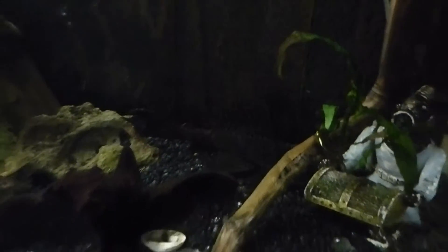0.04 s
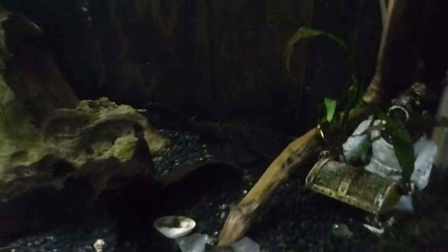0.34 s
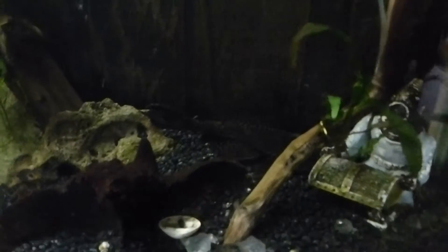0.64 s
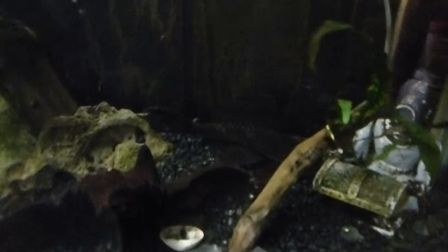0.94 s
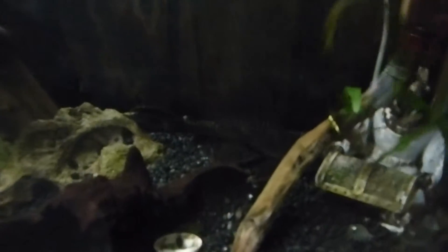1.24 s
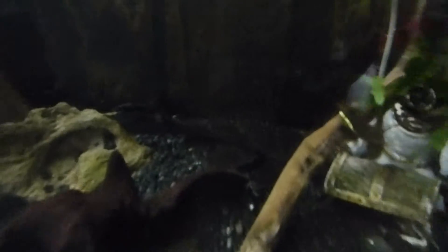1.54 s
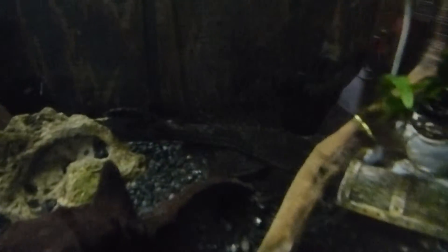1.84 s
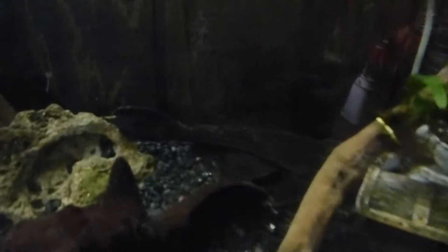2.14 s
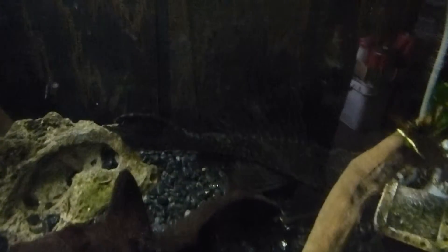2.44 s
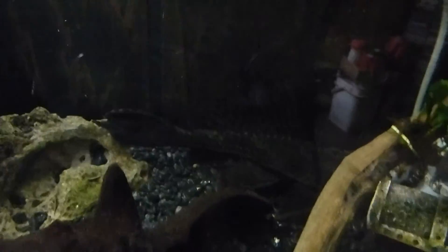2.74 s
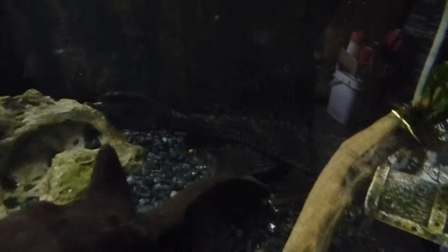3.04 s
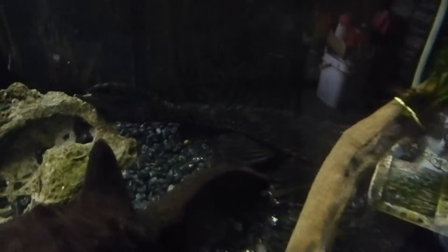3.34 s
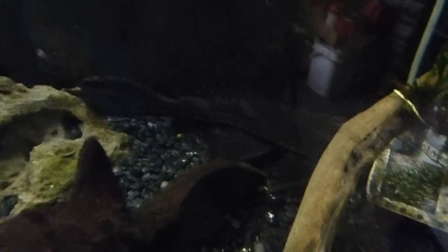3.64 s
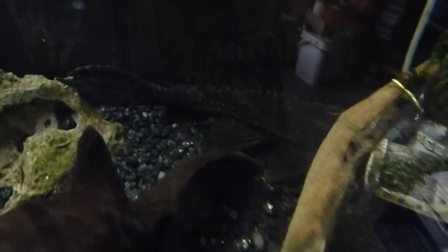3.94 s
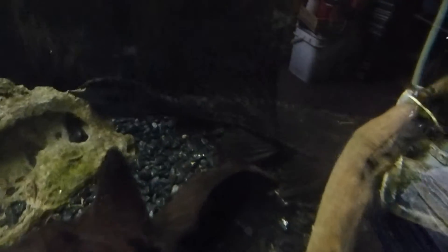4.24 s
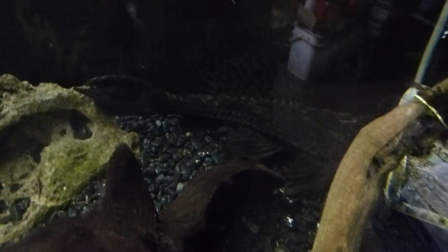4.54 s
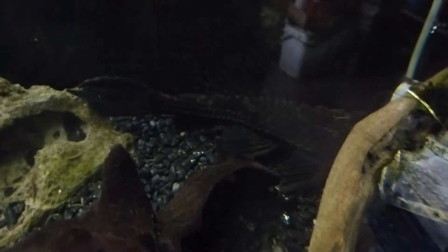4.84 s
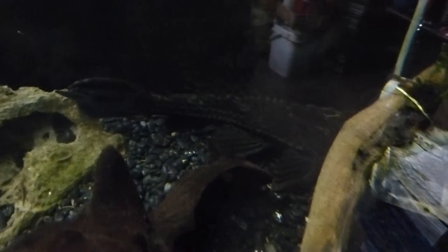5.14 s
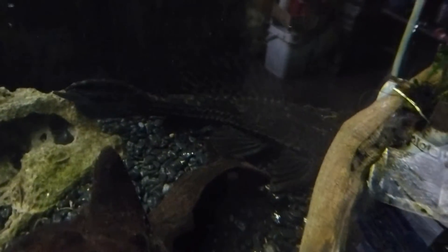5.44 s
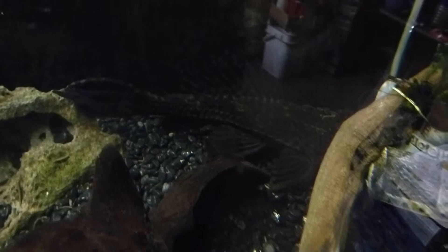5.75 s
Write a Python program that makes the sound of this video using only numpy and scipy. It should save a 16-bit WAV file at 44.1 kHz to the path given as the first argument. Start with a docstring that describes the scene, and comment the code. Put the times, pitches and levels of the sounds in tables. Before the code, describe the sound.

A filter outflow trickles softly into a large fish tank in a quiet room. Irregular drops plink and ping with a slight echo over a fine fizz of tiny bubbles, while a pump hums steadily underneath. The hum grows a little fuller as the microphone moves closer, just outside the glass. About four seconds in, something clicks sharply against the glass, and the dripping carries on.

```python
"""Fish tank in a quiet room

A filter outflow trickles into a large tank, heard from just outside the glass. Drops trap air bubbles
that ping and echo between water and lid, over a fine fizz of tiny ones. A mains pump hums, a little
fuller as the microphone moves in, and once something clicks sharply against the glass."""
import sys
import numpy as np
from scipy import signal
from scipy.fft import rfft, irfft, next_fast_len
from scipy.io import wavfile
from scipy.ndimage import uniform_filter1d

SR = 44100
rng = np.random.default_rng(int(sys.argv[2]) if len(sys.argv) > 2 else 0)


def to_wav(s):
    """Save 16-bit WAV."""
    ch = np.atleast_2d(s).T  # columns
    pcm = np.round(np.clip(ch, -1, 1) * 32767)  # PCM
    wavfile.write(sys.argv[1], SR, pcm.astype(np.int16))


N = 264717
T = np.arange(N) / SR


def from_db(db):
    return 10 ** (np.asarray(db) / 20)


def rms_one(x):
    return x / np.sqrt(np.mean(x ** 2) + 1e-20)


def gain_at_mic(near, far_db, near_db):
    """Gain between the microphone's far spot (near = 0) and its close one (near = 1)."""
    return from_db(far_db + (near_db - far_db) * near)


def spectrum_gain(spectrum, hz):
    """Gain read from rows of Hz and dB on a log-frequency axis."""
    row_hz, row_db = np.transpose(spectrum)
    return from_db(np.interp(np.log(np.maximum(hz, 1)), np.log(row_hz), row_db))


def fade(t, t60):
    """Falls by 60 dB in t60 seconds."""
    return np.exp(-np.log(1000) * t / t60)


def add(out, start_s, sound):
    """Mixes a sound in at its start time."""
    i = int(np.clip(round(start_s * SR), 0, N - 1))
    out[i:i + len(sound)] += sound[:N - i]


def lowpass(x, hz):
    return signal.lfilter(*signal.butter(2, hz, fs=SR), x)


def noise(gain_at):
    """Steady noise with a given gain over frequency; rms 1."""
    size = next_fast_len(N)
    spectrum = rfft(rng.standard_normal(size)) * gain_at(np.fft.rfftfreq(size, 1 / SR))
    return rms_one(irfft(spectrum, size)[:N])


def drift(rate_hz):
    """A slow random wander; rms 1."""
    return noise(lambda hz: 1 / (1 + (hz / rate_hz) ** 2))


def tank_echoes(t60, direct=0.27, room_db=-13, room_t60=0.7, build_s=0.0087):
    """Direct sound, reflections building up between water, glass and lid, then the room; energy 1."""
    t = T[:SR // 3]
    reflections = rng.standard_normal(len(t)) * (rng.random(len(t)) < 4000 / SR)
    early = reflections * fade(t, t60) * (1 - fade(t, build_s))
    late = rng.standard_normal(len(t)) * fade(t, room_t60)
    path = early / np.linalg.norm(early) + from_db(room_db) * late / np.linalg.norm(late)
    path[0] += direct
    return path / np.linalg.norm(path)


def lamp():
    """The tank lamp's electronics give a very faint, high whine."""
    # Each row: pitch in Hz, rms level in dB.
    whine = [(13383, -80), (13625, -81), (13684, -81), (13803, -78), (14282, -84), (14583, -83),
             (14643, -83), (14766, -83)]
    return sum(np.sqrt(2) * from_db(db) * np.sin(2 * np.pi * (hz * T + rng.random()) + drift(2))
               for hz, db in whine)


def rumble(near):
    """Water rushing through the filter, and the room's own low noise."""
    # Each row: frequency in Hz, relative spectral density in dB.
    rush_spectrum = [(25, -42), (42, -23), (70, -18.5), (100, -3.5), (140, -5), (220, -1.5), (310, -4.5),
                     (390, -6.5), (520, -7), (700, -8), (800, -7.5), (1100, -11), (1600, -18),
                     (3000, -21.5), (16000, -44.5)]
    return gain_at_mic(near, far_db=-52.5, near_db=-50) * noise(lambda hz: spectrum_gain(rush_spectrum, hz))


def pump(near, mains_hz=60.02, level_waver=0.062, phase_waver_rad=0.16):
    """Mains hum whose balance shifts with the microphone's place; churning water rings the housing."""
    # The hum's partials. Each row: multiple of the mains, rms level in dB from afar, the same close up.
    hum = [(.5, -75, -78), (1, -62, -62.5), (2, -71, -65.5), (2.5, -63, -62.5), (3, -52.5, -51),
           (4, -58.5, -57.5), (5, -59.5, -49), (6, -62, -62.5), (7, -63.5, -60), (8, -61.5, -59.5),
           (9, -73, -67)]
    # The housing's resonances. Each row: centre in Hz, half-width in Hz, rms level close up in dB.
    housing = [(633, 14.5, -58.5), (689, 13.6, -59.5)]
    out = np.zeros(N)
    for multiple, far_db, near_db in hum:
        phase = 2 * np.pi * (multiple * mains_hz * T + rng.random()) + phase_waver_rad * drift(6.1)
        level = gain_at_mic(near, far_db, near_db) * (1 + level_waver * drift(3.1))
        out += np.sqrt(2) * level * np.sin(phase)
    distance_loss_db = 11.7 * (1 - near) ** 2
    for centre, width, db in housing:
        out += from_db(db - distance_loss_db) * noise(lambda hz: 1 / (1 + ((hz - centre) / width) ** 2))
    return out


def glass_click(start_s=4.2446, snap_hz=1400):
    """One hard contact: a snap and a bright crack, two dull near echoes, and briefly ringing glass."""
    # The pane's modes. Each row: pitch in Hz, relative level in dB, seconds to fall 60 dB.
    glass_modes = [(97.5, -23, .055), (266, -28, 0.049), (320, -20, 0.038), (635, -32, 0.011),
                   (1005, -14.5, 0.054), (1098, -8, 0.023), (1483, -20, 0.05), (1990, -24, 0.036),
                   (2690, -24, 0.015), (4040, -29, 0.013)]
    # Echoes off nearby surfaces. Each row: delay in seconds, signed gain.
    near_echoes = [(.0022, -0.85), (.004, 0.17)]
    t, out = T[:SR // 4], np.zeros(N)
    snap = from_db(-6) * np.cos(2 * np.pi * snap_hz * t) * fade(t, 0.0028)
    crack = from_db(-23) * rng.standard_normal(len(t)) * fade(t, 0.016)
    contact = lowpass(snap, 4500) + lowpass(crack, 11000)
    ring = sum(from_db(db - 4) * np.sin(2 * np.pi * hz * t) * fade(t, t60) for hz, db, t60 in glass_modes)
    ring *= 1 - fade(t, 0.0072)   # the pane takes a moment to get going
    add(out, start_s, contact + ring)
    for delay_s, gain in near_echoes:
        add(out, start_s + delay_s, gain * lowpass(contact, 2200))
    add(out, start_s, from_db(-27) * signal.fftconvolve(contact + ring, tank_echoes(0.13)))
    bass_cut = signal.butter(4, 68, "high", fs=SR, output="sos")   # a small source radiates no deep bass
    return signal.sosfilt(bass_cut, out)


def droplets(bursts, band_hz, t60, gain_db):
    """Each burst scatters a crackle of droplets too small to ring."""
    out, t = np.zeros(N), T[:SR // 5]
    band = signal.butter(2, band_hz, "band", fs=SR, output="sos")
    for start_s, db in bursts:
        crackle = rng.standard_normal(len(t)) * (rng.random(len(t)) < 6000 / SR)
        add(out, start_s, from_db(db + gain_db) * rms_one(signal.sosfilt(band, crackle)) * fade(t, t60))
    return out


def spray():
    """Drops burst into bright, lingering spray."""
    # Each row: start in seconds, relative level in dB.
    bursts = [(.341, -47.5), (.878, -52), (1.019, -52), (1.962, -45), (2.250, -44.5), (2.377, -44.5),
              (2.592, -50), (2.982, -47.5), (3.433, -47.5), (3.552, -52), (4.447, -48), (4.797, -48.5),
              (4.982, -49), (5.124, -48.5), (5.680, -54), (5.967, -49)]
    return droplets(bursts, band_hz=(4160, 13000), t60=0.15, gain_db=2.5)


def surface_pops():
    """Bubbles pop on the surface with a short, dry tick."""
    # Each row: start in seconds, relative level in dB.
    pops = [(.846, -48), (1.573, -36.5), (1.609, -44), (1.852, -43), (3.433, -46), (5.680, -40)]
    return droplets(pops, band_hz=(1500, 8900), t60=0.024, gain_db=0.5)


def ping(hz, cycles, rise, swell_cycles=8):
    """A bubble swells into ringing and dies away; rise lifts its pitch as it nears the surface."""
    t60 = cycles / hz
    t = T[:int(t60 * SR) + 2]
    phase = 2 * np.pi * hz * t * (1 + rise * t / t60)
    return np.sin(phase) * fade(t, t60) * (1 - fade(t, swell_cycles / hz))


def trickle(near, spread_db=4.5, bunching_db=1.12):
    """Countless small bubbles of every size, coming in bunches as the stream wobbles."""
    # The bubbles' tone colour. Each row: frequency in Hz, relative spectral density in dB.
    bubble_spectrum = [(900, -10), (1200, 5), (1600, 4.5), (2000, 2.5), (2600, -0.5), (3100, -4),
                       (4200, -2.5), (6200, -9.5), (7500, -5.5), (9300, -11.5), (10800, -8.5), (12500, -15),
                       (14000, -8.5), (16000, -23)]
    chance = 65 / SR * from_db(bunching_db * drift(10))
    gurgle, patter, fizz = np.zeros((3, N))
    for hz in np.geomspace(950, 15000, num=44):
        born = np.flatnonzero(rng.random(N) < chance * np.sqrt(hz / 3000))   # small ones are more common
        strength_db = spread_db * np.minimum(rng.exponential(1, len(born)), 3)
        kicks = np.zeros(N)
        kicks[born] = from_db(strength_db) * rng.choice([-1, 1], len(born))
        bubble = signal.fftconvolve(ping(hz, cycles=28, rise=0), tank_echoes(0.12, direct=0.35))
        band = rms_one(signal.oaconvolve(kicks, bubble)[:N]) * spectrum_gain(bubble_spectrum, hz)
        layer = gurgle if hz < 2200 else patter if hz < 6200 else fizz
        layer += band * np.sqrt(hz)   # higher bands are wider
    return (gain_at_mic(near, far_db=-57.5, near_db=-54) * rms_one(gurgle)
            + gain_at_mic(near, far_db=-52, near_db=-54) * rms_one(patter)
            + from_db(-56) * rms_one(fizz))


def stray_drops(per_s=5, low_hz=3500, high_hz=12000):
    """Soft drops at random moments, their bubbles spread evenly over the octaves."""
    draws = rng.random((int(per_s * N / SR), 3))
    return [(when * N / SR, low_hz * (high_hz / low_hz) ** size, -52.5 + 5 * force)
            for when, size, force in draws]


def drips(splash_db=-21, splash_t60=0.013, echo_t60=0.12, typical_db=-40.5):
    """Each drop makes a tiny, bright splash and traps one bubble, at a spot with echoes of its own."""
    # The loudest drops. Each row: start in seconds, bubble pitch in Hz, relative level in dB.
    loud_drops = [ (.088, 2640, -42), (.141, 5100, -45.5), (.171, 1950, -47), (.206, 10900, -47),
                  (.296, 2570, -39), (.556, 2124, -36.5), (.586, 1920, -42.5), (.846, 4300, -43.5),
                  (1.021, 2510, -42), (1.074, 2750, -46), (1.332, 1410, -40.5), (1.393, 3500, -46),
                  (1.600, 4270, -45), (1.853, 1445, -36), (1.875, 3190, -45.5), (1.934, 5240, -47),
                  (1.966, 1590, -47), (2.058, 1554, -34), (2.131, 3250, -43.5), (2.182, 1520, -46.5),
                  (2.191, 5810, -46), (2.252, 7250, -45), (2.607, 2770, -44.5), (2.697, 4150, -43),
                  (2.793, 1660, -43), (2.821, 10900, -44.5), (2.874, 1530, -42.5), (2.907, 2260, -45),
                  (2.975, 4250, -42.5), (3.072, 2060, -45.5), (3.223, 3510, -47), (3.255, 4270, -44.5),
                  (3.387, 8400, -47), (3.433, 3940, -40.5), (3.552, 8400, -45), (3.583, 5100, -43),
                  (3.650, 3550, -41), (3.885, 1530, -45), (4.084, 2590, -43), (4.422, 3950, -38.5),
                  (4.435, 1830, -42), (4.456, 1750, -37.5), (4.610, 2100, -45), (4.668, 1750, -43),
                  (4.772, 2360, -46), (4.838, 1660, -41), (4.871, 7790, -48), (5.125, 10800, -47),
                  (5.485, 1530, -43), (5.680, 4860, -40), (5.708, 1620, -37.5), (5.769, 2840, -43.5),
                  (5.97, 8640, -42)]
    out, t = np.zeros(N), T[:SR // 20]
    splash_band = signal.butter(2, [2500, 11000], "band", fs=SR, output="sos")
    for start_s, hz, db in loud_drops + stray_drops():
        splash = signal.sosfilt(splash_band, rng.standard_normal(len(t)))
        drop = from_db(splash_db) * splash * fade(t, splash_t60)
        add(drop, 0, ping(hz, cycles=29, rise=0.0039))
        direct = 0.47 * from_db(0.36 * (db - typical_db))   # louder drops are nearer and drier
        heard = signal.fftconvolve(drop, tank_echoes(echo_t60, direct))
        peak_rms = np.sqrt(uniform_filter1d(heard ** 2, size=530).max())   # the loudest 12 ms
        add(out, start_s, heard * from_db(db - 1) / peak_rms)
    return out


def scene(move_start_s=0.87, move_end_s=3.7):
    """One microphone outside the glass, moving in at an even pace."""
    near = np.clip((T - move_start_s) / (move_end_s - move_start_s), 0, 1)
    bed = trickle(near) + pump(near) + rumble(near) + lamp()
    return (bed + glass_click() + spray() + surface_pops() + drips())[None, :]


def record(dry, cutoff_hz=15700):
    """The top treble is cut steeply."""
    return signal.sosfilt(signal.ellip(12, 0.1, 70, cutoff_hz, fs=SR, output="sos"), dry)


dry = scene()
out = record(dry)
to_wav(out)
```